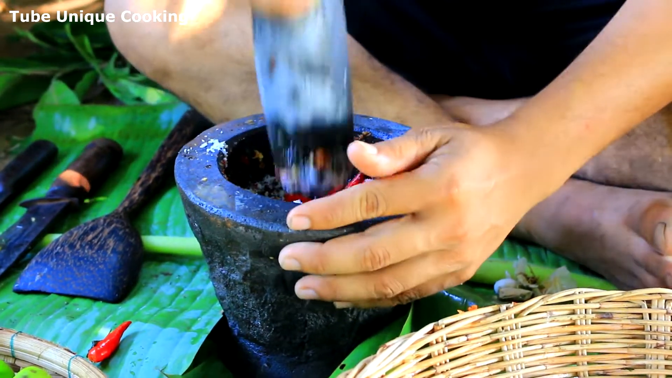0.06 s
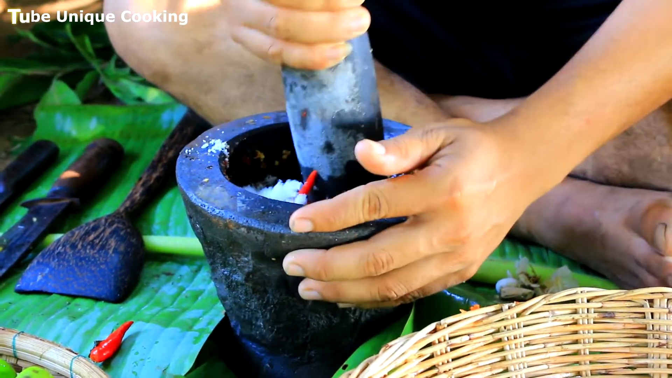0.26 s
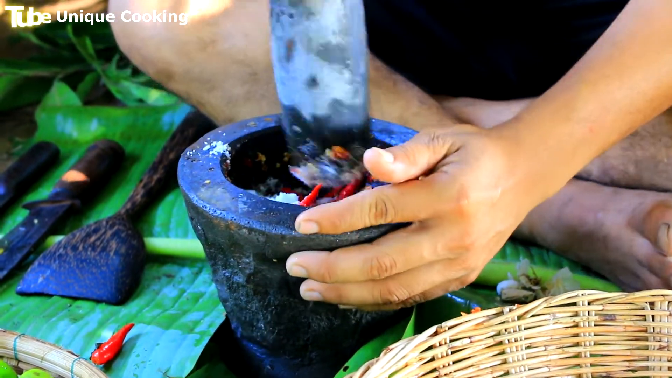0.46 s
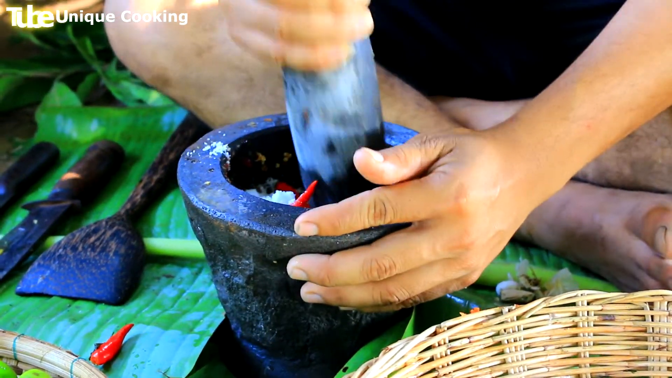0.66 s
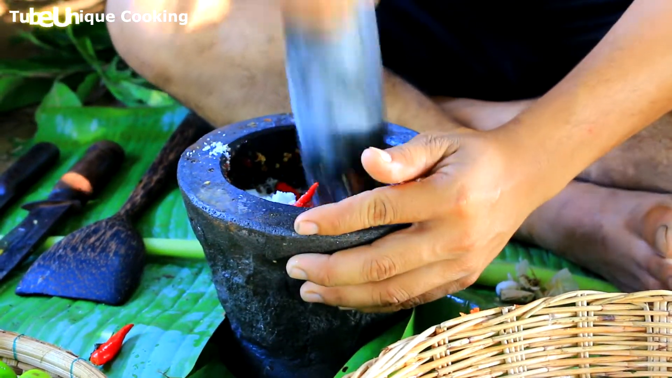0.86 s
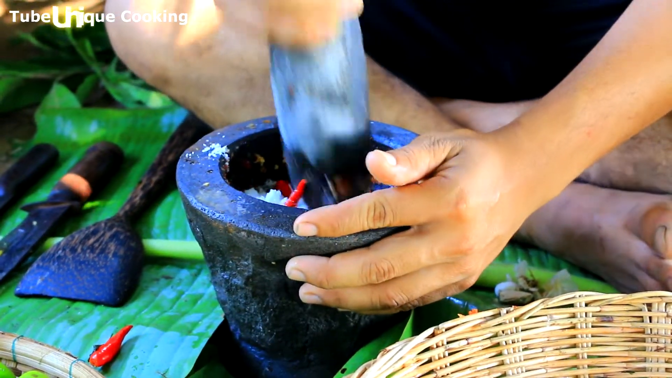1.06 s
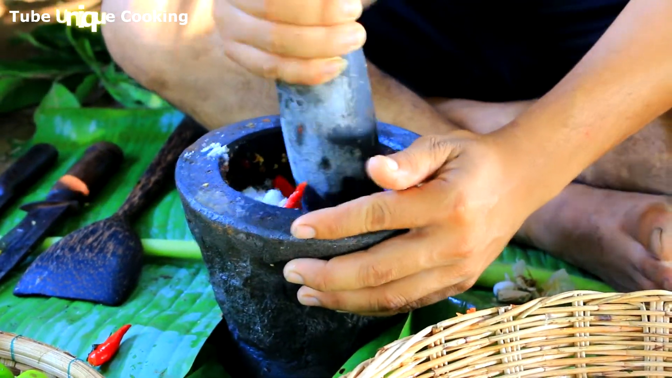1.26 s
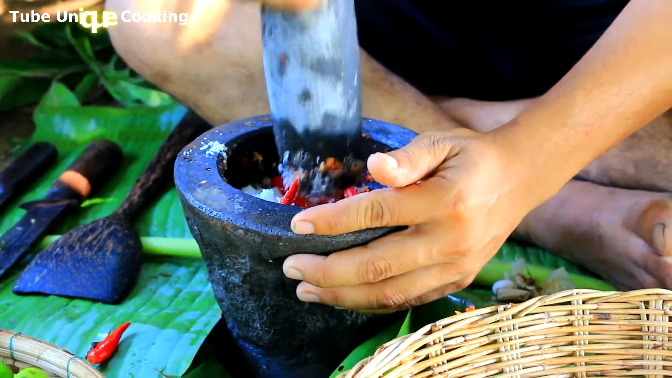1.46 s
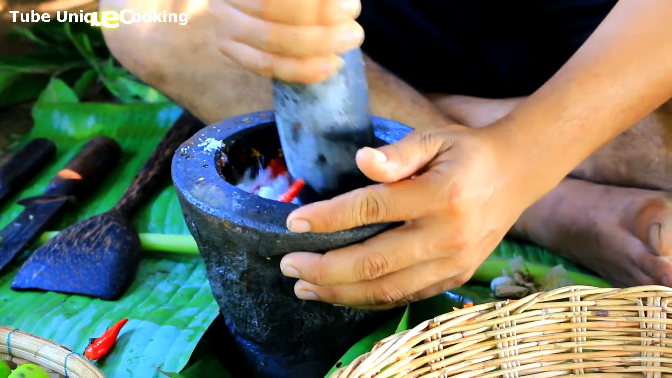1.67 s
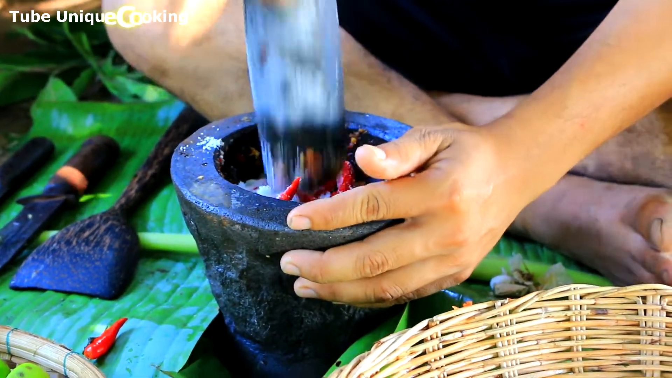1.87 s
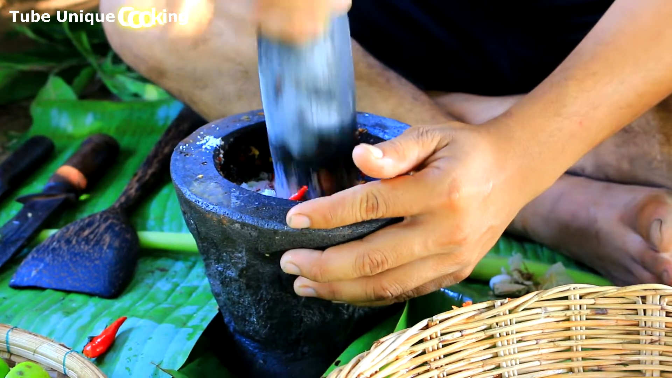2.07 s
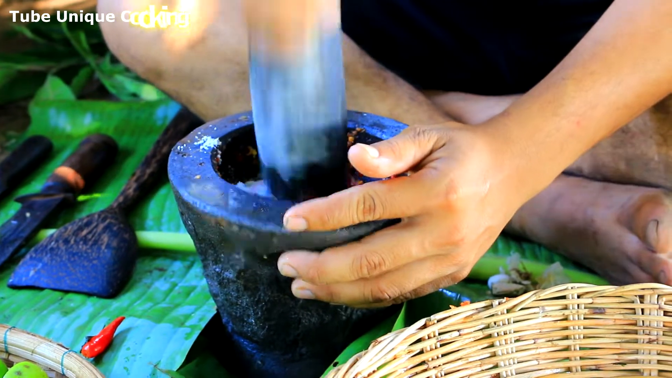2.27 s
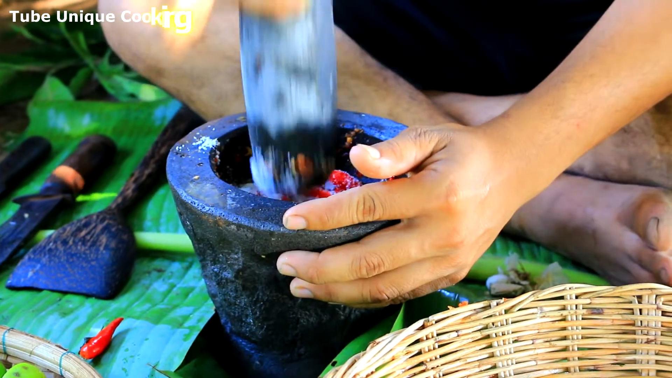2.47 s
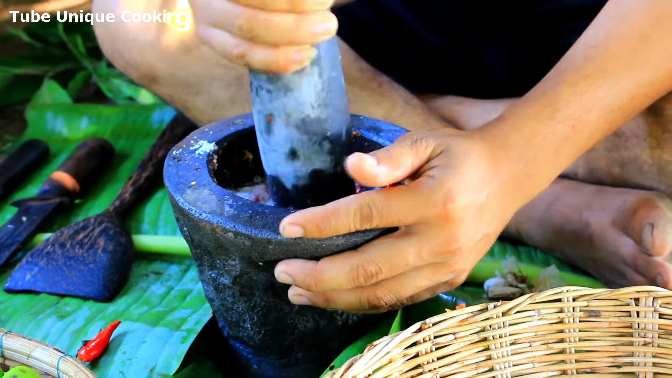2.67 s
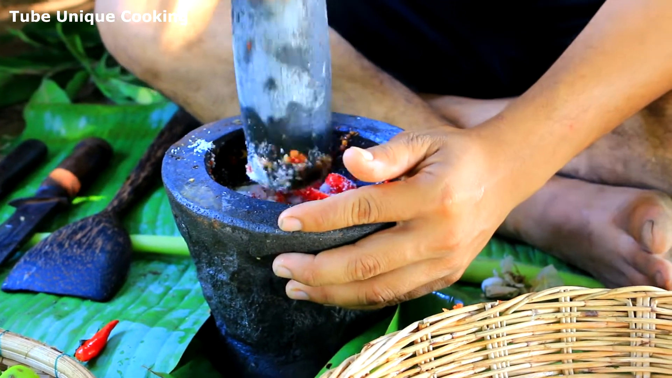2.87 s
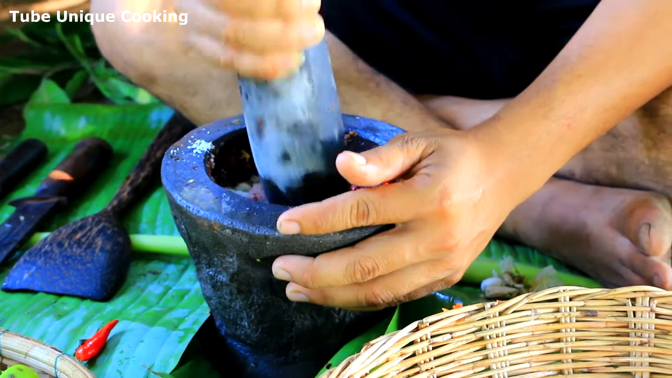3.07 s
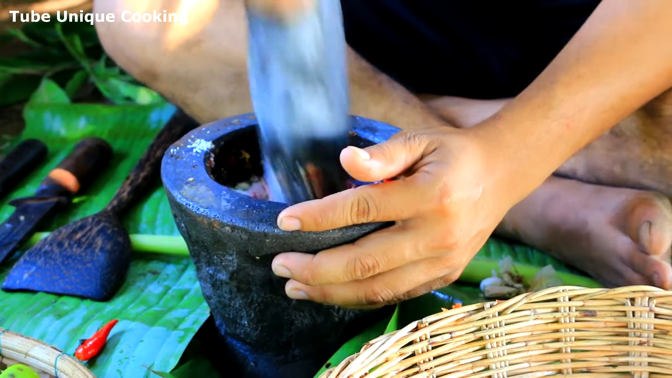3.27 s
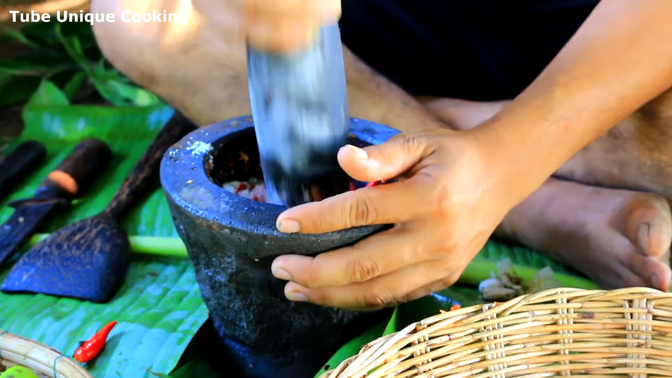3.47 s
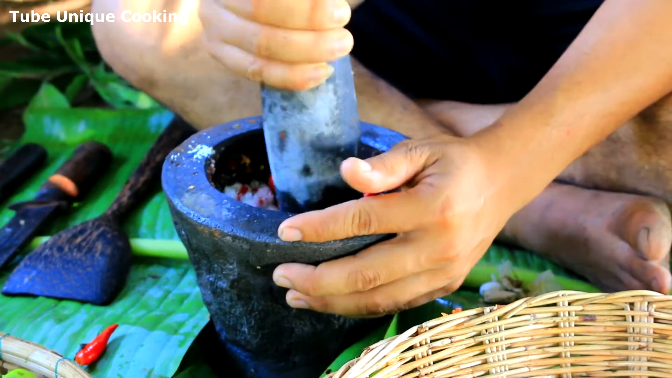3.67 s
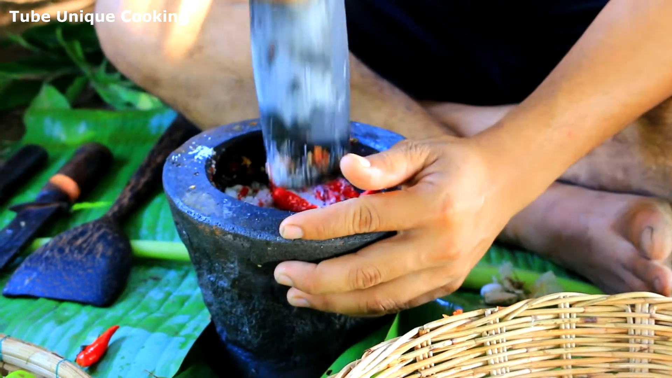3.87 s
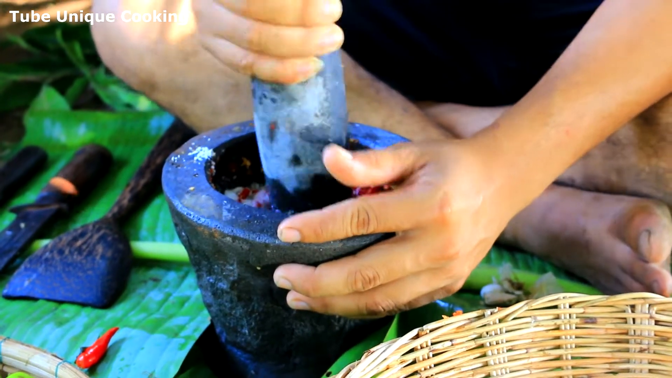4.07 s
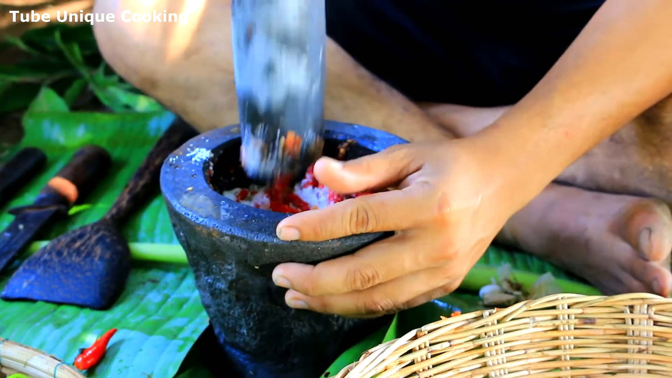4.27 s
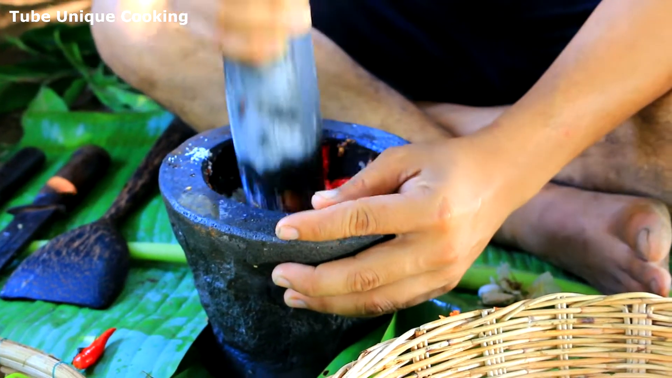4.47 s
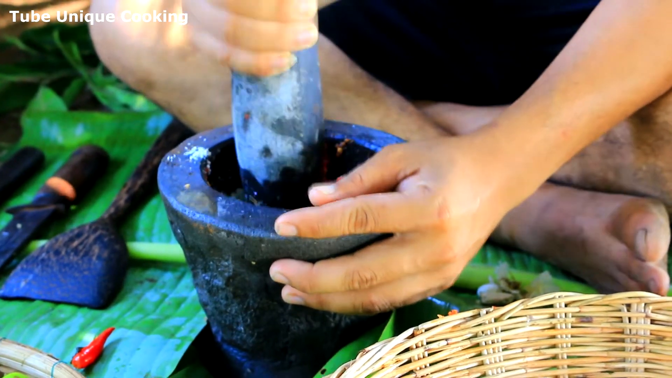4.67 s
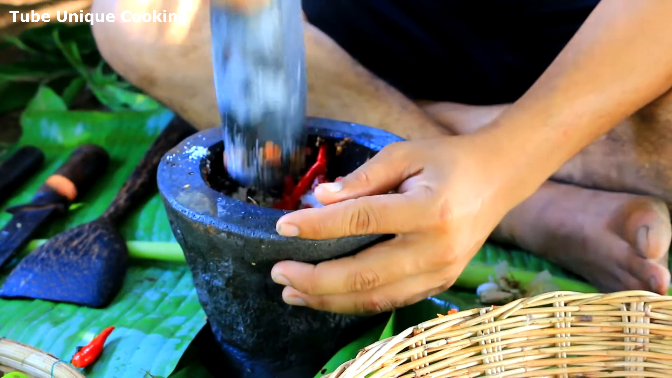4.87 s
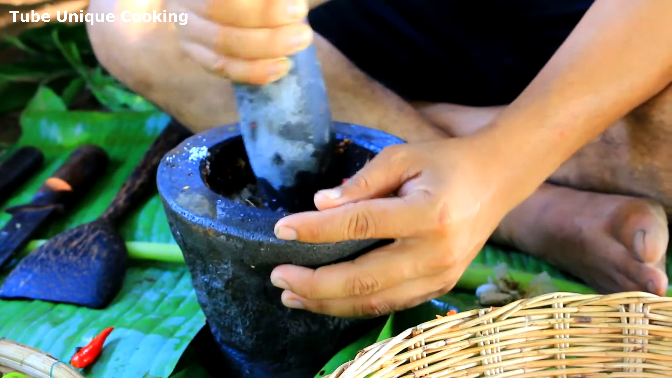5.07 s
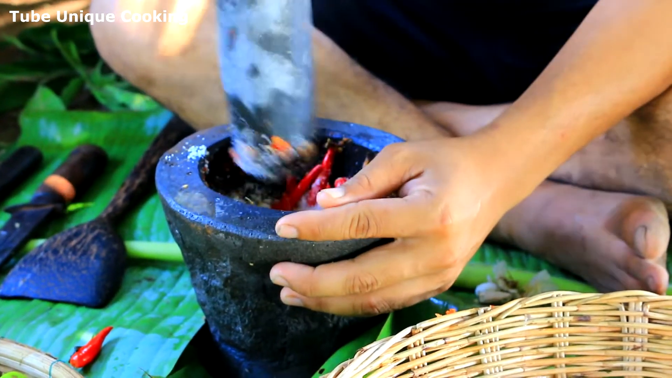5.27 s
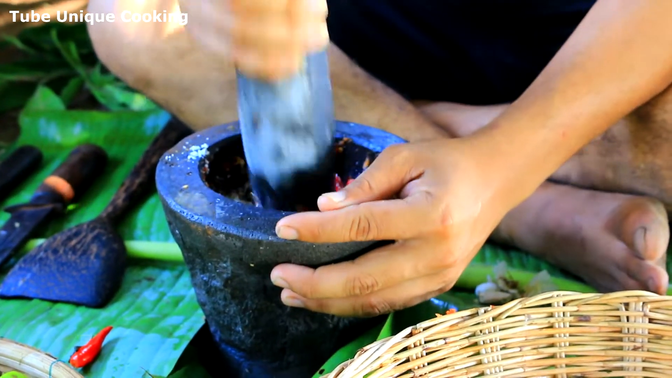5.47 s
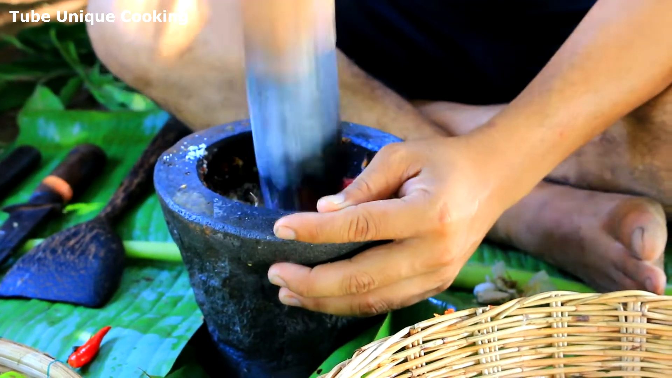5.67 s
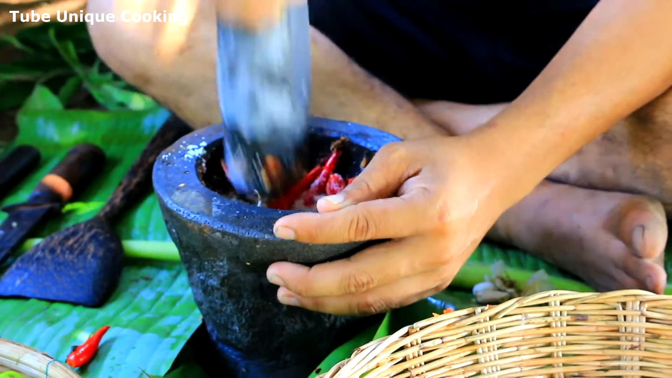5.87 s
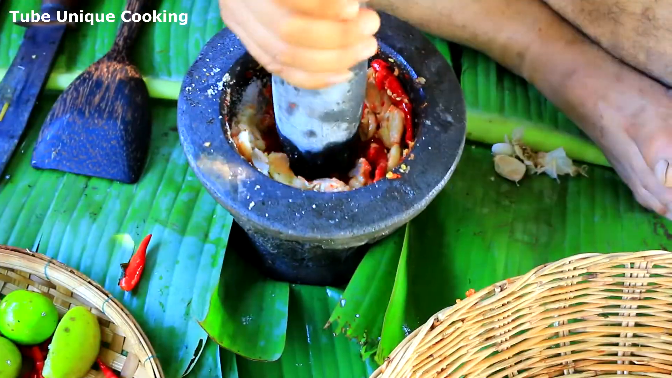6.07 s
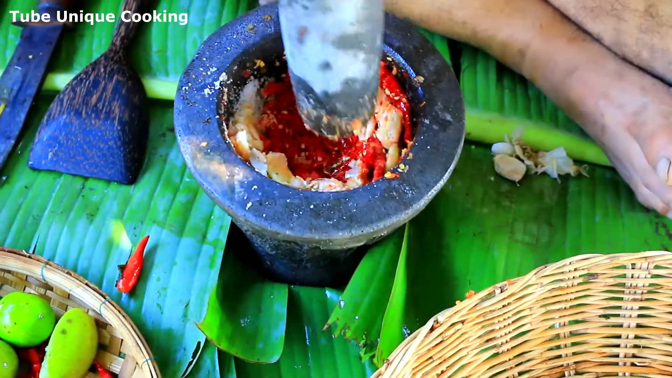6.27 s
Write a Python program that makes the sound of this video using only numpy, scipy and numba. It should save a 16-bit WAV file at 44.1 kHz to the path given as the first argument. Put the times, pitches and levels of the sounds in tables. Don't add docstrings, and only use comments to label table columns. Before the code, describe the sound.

Gritty, clicking knocks of stone on stone repeat evenly outdoors, with a clear whistled bird trill early on, light wind flutter and soft hiss.

```python
import sys
import numpy as np
from scipy import signal
from scipy.fft import rfft, irfft
from scipy.io import wavfile
from scipy.ndimage import uniform_filter1d
from numba import njit

SR = 44100
rng = np.random.default_rng(int(sys.argv[2]) if len(sys.argv) > 2 else 0)


def transcribe(signal):
    frames = np.atleast_2d(signal).T
    limited = np.clip(frames, -1, 1)
    pcm = np.round(limited * 32767).astype(np.int16)
    wavfile.write(sys.argv[1], SR, pcm)


def invert_db(x):
    u = np.asarray(x, float) / 20
    return 10 ** u


N = 279153
TIME = np.arange(N) / SR

# start_s, level_db, length_s, bowl_over_treble_db, paste_over_treble_db
CRUSHING_BLOWS = [(0.2336, -40.5, 0.02, -7.5, -21.5), (0.5754, -42.5, 0.017, -6, -16),
                  (0.9313, -39, 0.0072, -6.5, -9.5), (1.2624, -36, 0.0088, -9, -13),
                  (1.5994, -40, 0.02, -3, -27), (1.943, -42, 0.015, -6.5, -13.5),
                  (2.3014, -42, 0.02, -9, -17.5), (2.6574, -45, 0.017, -1, -18),
                  (2.9854, -42.5, 0.018, -4.5, -15), (3.3418, -40.5, 0.017, -5, -17),
                  (3.6682, -44.5, 0.012, -2.5, -11), (4.0108, -36, 0.006, -3, -12),
                  (4.355, -38.5, 0.024, -4.5, -32), (4.6963, -34, 0.0055, -9.5, -16.5),
                  (5.0319, -38, 0.0065, -5, -7.5), (5.3822, -36.5, 0.0026, -5, -25),
                  (5.7168, -36.5, 0.0059, -4.5, -8.5), (6.0156, -42.5, 0.017, 2.2, -17)]
# knock_s, knock_db, thud_s, thud_db, bounce_hz
STONE_CONTACTS = [(0.2409, -22, 0.2417, -47, 105), (0.5786, -24, 0.5814, -35.5, 140),
                  (0.9337, -23, 0.9327, -29, 151), (1.2678, -28.5, 1.2664, -26.5, 158),
                  (1.6144, -21, 1.5882, -56, 191), (1.9488, -27, 1.9591, -48, 96.5),
                  (2.3107, -23, 2.3169, -47.5, 129.6), (2.665, -29.5, 2.6649, -34, 157),
                  (2.9895, -25, 3.005, -37, 96), (3.3555, -23, 3.3472, -39.5, 155),
                  (3.6762, -18.5, 3.6721, -29.5, 155), (4.016, -13, 4.0187, -43, 121),
                  (4.3612, -47, 4.3602, -48.5, 141), (4.6994, -20, 4.7006, -28.5, 153),
                  (5.0328, -35, 5.0351, -29, 154), (5.3842, -6, 5.3838, -25.0, 154),
                  (5.7205, -21.5, 5.7199, -21.5, 170), (6.0194, -18.5, 6.0103, -32.5, 135)]


@njit
def svf(x, hz, width):
    y, b, l = np.empty(len(x)), 0., 0.
    for i in range(len(x)):
        g, k = np.tan(np.pi * hz[i] / SR), width[i] / hz[i]
        v = (b + g * (x[i] - l)) / (1 + g * (g + k))
        b, l, y[i] = 2 * v - b, l + 2 * g * v, k * v
    return y


def band(x, hz, width):
    return signal.lfilter(*signal.iirpeak(hz, hz / width, fs=SR), x)


def body(x, modes, alternate=False, tint_db=None):
    tint_db = np.zeros(len(modes)) if tint_db is None else tint_db
    out = 0
    for k, (hz, width, db) in enumerate(modes):
        sign = (-1) ** (k * alternate)
        out = out + sign * invert_db(db + tint_db[k]) * band(x, hz, width)
    return out


def unit(x):
    return x / np.sqrt(np.mean(x ** 2))


def walk(rate):
    k = int(SR / rate)
    held = np.repeat(rng.standard_normal(N // k + 1), k)
    return 1.39 * uniform_filter1d(uniform_filter1d(held, k), k)[:N]


def pan(db):
    return invert_db(np.array([db + 0 * TIME, -db + 0 * TIME]) / 2)


def echoes(x, t60, db, gap, spread, sparse_db):
    t = np.arange(int(SR * .8)) / SR
    mid, side = rng.standard_normal((2, len(t))) * invert_db(sparse_db * rng.standard_normal(len(t)))
    fade = np.clip((t - gap) / gap, 0, 1) * invert_db(-60 * t / t60)
    tail = fade * (mid + spread * side * np.array([[1], [-1]]))
    tail = tail / np.sqrt(np.sum(tail[0] ** 2))
    return invert_db(db) * signal.fftconvolve(x[None], tail, axes=1)[:, :N]


def played(rows, shape):
    notes = []
    for s, hz, db, length in rows:
        notes.append([(s + when * length, hz * ratio, db + under_db) for when, ratio, under_db in shape])
    return notes


def sung(notes):
    notes = sorted(notes, key=lambda n: n[0][0])
    s, hz, db = np.transpose(np.concatenate(notes))
    on = sum((TIME >= n[0][0]) & (TIME <= n[-1][0]) for n in notes) > 0
    gain = uniform_filter1d(on * invert_db(np.interp(TIME, s, db)), size=130)
    return gain, uniform_filter1d(np.interp(TIME, s, hz), size=130)


def eddies(table):
    out = np.zeros(N)
    for (s, db, hz), turn in zip(table, rng.random(len(table))):
        near = slice(max(int((s - .06) * SR), 0), int((s + .06) * SR))
        cycles = hz * (TIME[near] - s)
        envelope = np.exp(-(cycles / .5) ** 2)
        out[near] += invert_db(db + .8) * envelope * np.cos(2 * np.pi * (cycles + turn))
    return out


def wind():
    # time_s, level_db
    gusts = [(0.0, -70), (0.63, -63.5), (1.16, -59.5), (1.43, -56.5), (1.6, -64), (1.97, -60), (2.11, -66),
             (2.52, -61), (2.75, -67.5), (3.42, -63.5), (3.7, -74), (3.84, -61.5), (4.32, -62.5),
             (4.53, -70), (4.95, -69), (5.59, -62.5), (5.92, -62), (6.33, -56.5)]
    # centre_hz, width_hz, level_db
    flutter_modes = [(30, 25, -38), (57.7, 40, 23), (100, 102, -8.5), (169, 270, -1), (260, 150, -18.5)]
    # time_s, peak_db, pitch_hz
    left_eddies = [(0.773, -39, 120), (0.878, -35, 115), (1.024, -37, 117), (1.054, -34, 133),
                   (1.201, -31, 143), (1.35, -34, 152), (1.376, -36, 185), (1.427, -37, 108),
                   (1.506, -28.5, 150), (1.808, -32.5, 115), (1.922, -31, 91), (1.965, -36, 95),
                   (2.012, -37, 117), (2.131, -32.5, 77), (2.156, -36, 124), (2.408, -31, 141),
                   (2.458, -28.5, 102), (2.487, -37, 113), (3.168, -34, 79), (3.771, -38, 120),
                   (4.093, -38.5, 93), (4.286, -37, 127), (4.437, -38, 136), (5.342, -35, 113),
                   (5.51, -37, 127), (5.65, -32.5, 87), (5.979, -35, 192), (6.194, -31, 115),
                   (6.217, -25.5, 165), (6.262, -34, 94)]
    right_eddies = [(0.004, -41, 118), (0.031, -39, 85), (0.432, -42, 98), (1.145, -42, 118),
                    (1.172, -37, 114), (1.204, -39, 87), (1.522, -35, 96), (1.571, -40, 110),
                    (1.782, -40, 91), (2.998, -41, 115), (3.153, -36, 86), (4.387, -40, 77)]
    low = signal.butter(3, 260, fs=SR, output="sos")
    bumps = invert_db(3 * np.array([walk(45), walk(45)]))
    ports = []
    for lumps in bumps:
        rumble = body(rng.standard_normal(N) * lumps, flutter_modes)
        ports.append(unit(signal.sosfilt(low, rumble)))
    left, right = eddies(left_eddies), eddies(right_eddies)
    gust_db = np.interp(TIME, *np.transpose(gusts)) + 7.8
    flutter = invert_db(gust_db) * pan(5.7) * np.array(ports)
    return flutter + np.array([left, right + 0.05 * left])


def hiss():
    # frequency_hz, density_db (per Hz)
    spectrum = np.array([(88, -33), (150, -8), (269, -4), (1010, -8), (2430, -10.3), (7830, -14.8),
                         (14600, -21), (15800, -27)])
    f = np.maximum(np.fft.rfftfreq(N, 1 / SR), 1)
    colour = invert_db(np.interp(np.log(f), np.log(spectrum[:, 0]), spectrum[:, 1]))
    shared, left, right = irfft(rfft(rng.standard_normal((3, N))) * colour, N)
    single_swell_db = 3.0 * np.exp(-((TIME - 4.18) / .22) ** 2)
    swell_db = single_swell_db + .7 * walk(9)
    return invert_db(-61 + 3.4 + swell_db) * pan(0.97) * unit(0.41 * shared + np.array([left, right]))


def bird():
    # time_s, pitch_hz, level_db
    chirps = [
        [(0.0, 3486, -51), (.024, 3518, -41), (.037, 3440, -41), (.044, 3350, -58)],
        [(.886, 3014, -55), (.91, 3070, -33.5), (.928, 3040, -31.5), (.937, 2550, -32.5), (.944, 2480, -40),
         (.956, 1810, -50)],
        [(2.612, 1900, -56), (2.63, 1497, -58), (2.65, 1500, -50), (2.664, 2100, -41), (2.675, 1900, -60)],
    ]
    # start_s, pitch_hz, level_db, length_s
    trill = [(1.055, 3100, -30.5, .048), (1.2, 3110, -31.5, .052), (1.344, 3105, -31, .052),
             (1.483, 3105, -31, .049), (1.627, 3075, -31.5, .051), (1.765, 3065, -31.5, .051),
             (1.909, 3075, -31.5, .054), (2.053, 3072, -31.5, .053), (2.192, 3058, -31.5, .054),
             (2.338, 3050, -31.5, .053), (2.483, 3055, -31, .051)]
    # start_s, top_hz, level_db, length_s
    strokes = [(.62, 3550, -33, .052), (.742, 3550, -33, .061)]
    # start_s, top_hz, level_db, length_s
    flicks = [(2.746, 4150, -37.5, .023), (2.778, 3860, -36, .028), (2.811, 3730, -39, .031)]
    # time (note lengths), pitch (ratio to the note's), level_db (relative to the note's)
    trill_shape = [(-.43, .982, -21), (-.05, 1.0, -5.8), (.15, .988, -1.5), (.36, .956, -2.8),
                   (.64, .941, 0), (1.0, .937, -1.8), (1.13, .948, -16)]
    stroke_shape = [(0, .81, -24), (.36, .875, -4), (.52, .96, -5), (.56, .955, -8), (.69, .76, -1.5),
                    (.86, .61, -9), (1.0, .51, -14)]
    flick_shape = [(0, .86, -17), (.25, .965, -6), (.55, 1.0, 0), (.8, 1.0, -2), (1.05, .975, -13)]
    notes = chirps + played(trill, trill_shape) + played(strokes, stroke_shape) + played(flicks, flick_shape)
    gain, hz = sung(notes)
    falling = np.clip(-np.gradient(hz) * SR / 60000 - .25, 0, 1)
    warble = 2 * np.pi * 105 * TIME
    hz = hz + 300 * falling * np.sin(warble)
    gain = gain * (1 - 0.89 * falling * np.clip(0.25 + np.cos(warble), 0, 1))
    phase = 2 * np.pi * np.cumsum(hz) / SR
    whistle = np.sin(phase) + invert_db(-36.5) * np.sin(2 * phase)
    song = np.sqrt(2) * gain * invert_db(1.15 * walk(120)) * whistle
    song = song + invert_db(-12) * np.roll(song, int(.0085 * SR))
    return song + echoes(song, t60=.8, db=-15.5, gap=.006, spread=.12, sparse_db=6)


def grains():
    return unit(rng.standard_normal(N) * invert_db(1.9 * np.minimum(rng.exponential(size=N), 5)))


def blow_tint(modes, spread_db):
    blow = np.searchsorted(np.array(CRUSHING_BLOWS)[1:, 0] - .1, TIME)
    return spread_db * rng.standard_normal((len(CRUSHING_BLOWS), len(modes)))[blow].T


def crunch():
    # centre_hz, width_hz, level_db
    bowl_modes = [(1050, 250, -5.5), (1450, 320, -0.5), (1860, 480, 1.5), (2500, 410, 4.5),
                  (3350, 1350, -3.5), (3900, 870, -16.5)]
    # centre_hz, width_hz, level_db
    grit_modes = [(5100, 7200, -2.5), (8800, 5200, 3.5), (11100, 6700, -2.5)]
    force, settle = np.zeros((2, N))
    bowl_db, paste_db = np.zeros((2, N))
    for s, db, length, *colour in CRUSHING_BLOWS:
        after = np.clip(TIME - s - length, 0, None)
        rise = invert_db(db) * np.exp(np.clip(TIME - s, -1, 0) / 0.0045)
        swell = 1 + .5 * np.sin(np.pi * np.clip((TIME - s) / length, 0, 1))
        force += 0.6 * rise * swell * np.exp(-after / 0.0032)
        settle += rise * np.exp(-after / .032)
        now = TIME > s - .1
        bowl_db[now], paste_db[now] = colour
    ragged = invert_db(1.8 * walk(300))
    trickle = invert_db(2.5 * walk(150))
    sharp = ragged * (force + invert_db(-19) * settle)
    bite = np.roll(force, 40) ** 1.265 / np.maximum(uniform_filter1d(force, size=900), 1e-9) ** .4
    dull = ragged * (bite * invert_db(-3.5) + invert_db(-10) * settle * trickle)
    cracks, aside = grains(), grains()
    bowl = invert_db(bowl_db + 1.5) * unit(body(cracks, bowl_modes, True, blow_tint(bowl_modes, spread_db=1.2)))
    paste = invert_db(paste_db + 1.0) * unit(band(band(cracks, 810, 760), 810, 760))
    grit = unit(body(cracks, grit_modes, True, blow_tint(grit_modes, spread_db=.8)))
    wide_grit = invert_db(-5.5) * sharp * unit(body(aside, grit_modes, True))
    wide_bowl = invert_db(bowl_db - 8.5) * dull * unit(body(aside, bowl_modes[1:], True))
    side = (wide_grit + wide_bowl) * np.array([[1], [-1]])
    return pan(3.9) * (dull * (bowl + paste) + sharp * grit + side)


def knock():
    # centre_hz, width_hz, level_db
    stone_modes = [(1420, 420, -1), (1920, 380, 1.2), (2520, 460, 0), (3590, 1340, -10)]
    clicks = np.zeros(N)
    for s, db, *_ in STONE_CONTACTS:
        clicks[int((s - .003) * SR)] = invert_db(db - 10)
        clicks[int((s - .0003) * SR)] = invert_db(db)
    push = np.convolve(clicks, np.hanning(11))[:N]
    highpass = signal.butter(3, 1000, "highpass", fs=SR, output="sos")
    return -invert_db(5) * signal.sosfilt(highpass, body(push, stone_modes))


def thud():
    # pitch_hz, level_db, t60_s
    ground_modes = [(88, -11, 0.15), (125, -5.5, 0.135), (163.2, -0.5, 0.065), (245, -7, 0.04),
                    (340, -16, 0.04), (499, -23, 0.065)]
    out = np.zeros((2, N))
    t = TIME[:int(.3 * SR)]
    chances = rng.standard_normal((len(STONE_CONTACTS), len(ground_modes), 2, 1))
    for (s, db, hz), chance in zip(np.array(STONE_CONTACTS)[:, 2:], chances):
        stiff = (hz / 155) ** 0.32
        ring = 0
        for (f, g, t60), c in zip(ground_modes, 1.5 * chance):
            ring = ring + invert_db(g + c - 60 * t / t60) * np.sin(2 * np.pi * f * stiff * t)
        onset = 1 - np.exp(-t / 0.0026)
        i = int((s + 0.002) * SR)
        out[:, i:i + len(t)] -= (invert_db(db + 4.5) * ring * onset)[:, :N - i]
    return out


def husky(gain, hz, width):
    voices = [svf(svf(rng.standard_normal(N), hz, width), hz, width) for _ in range(3)]
    mix = 0.33 * voices[0] + 1.2 * np.array(voices[1:])
    return gain * np.sqrt(SR / width / 1.55) * mix * pan(2.4)


def scrape():
    # start_s, # pitch_hz, level_db, length_s, width_hz
    rasps = np.array([(.3, 2000, -67, .26, 300), (2.33, 7000, -61, .05, 9000),
                      (3.13, 12000, -63, .04, 6000), (4.02, 1060, -60, .37, 300),
                      (5.9, 5800, -63, .12, 1900)])
    # time (noise lengths), pitch (ratio to the noise's), level_db (relative to the noise's)
    rasp_shape = [(0, 1.0, -6), (.12, .99, 0), (.8, 1.03, -1), (1.0, 1.03, -10)]
    width = rasps[np.searchsorted(rasps[1:, 0], TIME), 4]
    gain, hz = sung(played(rasps[:, :4], rasp_shape))
    return husky(gain, hz, width) * invert_db(1.5 * walk(60))


def far_birds():
    # start_s, top_hz, level_db, length_s
    calls = [(.73, 6100, -62, .22), (4.17, 5900, -64, .24), (5.4, 6100, -59.5, .27)]
    # time (call lengths), pitch (ratio to the call's top), level_db (relative to the call's)
    wheeze_shape = [(0, .67, -10), (.2, .715, -4), (.55, .83, -.5), (.8, .95, 0), (1.0, 1.02, -18)]
    gain, hz = sung(played(calls, wheeze_shape))
    return husky(gain, hz, 1500 * (hz / 6000) ** 4.0)


def ticks():
    # start_s, peak_db, left_minus_right_db, pitch_hz, t60_s
    snaps = [(1.0294, -31, 0.0, 3250, 0.019), (3.0163, -27.5, 5.0, 3510, 0.013),
             (3.9534, -42, 6, 2300, 0.014), (4.6261, -26, -3, 9600, 0.018), (4.789, -39, 3, 6510, 0.02),
             (5.214, -31, -1, 7150, 0.023), (5.4454, -35, 2.0, 2300, 0.0083),
             (5.5496, -34.5, 1.0, 5120, 0.023), (5.785, -36.5, 4, 2070, 0.034),
             (6.123, -27.5, -1, 2760, 0.029)]
    out = np.zeros((2, N))
    for (s, db, pan_db, hz, t60), puff in zip(snaps, rng.standard_normal((len(snaps), 2, 900))):
        fade = invert_db(db - 10 - 60 * TIME[:900] / max(t60, .002))
        puff = puff + 6 * (np.arange(900) == 0)
        b, a = signal.butter(2, [hz / 2, min(hz * 2, 17000)], "bandpass", fs=SR)
        snap = signal.lfilter(b, a, fade * (.6 * puff[0] + .8 * puff))
        i = int((s + .001) * SR)
        out[:, i:i + 900] += snap * pan(pan_db)[:, :900]
    return out


def scene():
    mortar = crunch() + knock() * pan(3.0) + thud() * pan(3.9)
    spill = echoes(mortar[0], t60=.13, db=-20, gap=.004, spread=.7, sparse_db=6)
    return wind() + hiss() + bird() + mortar + spill + scrape() + far_birds() + ticks()


def roll_off(x):
    return signal.sosfilt(signal.butter(12, 16670, fs=SR, output="sos"), x)


def record(dry):
    dry = signal.sosfilt(signal.butter(2, 42, "highpass", fs=SR, output="sos"), dry)
    dry = signal.sosfilt(signal.ellip(8, .2, 60, 15900, fs=SR, output="sos"), dry)
    return roll_off(dry)


dry = scene()
out = record(dry)
transcribe(out)
```